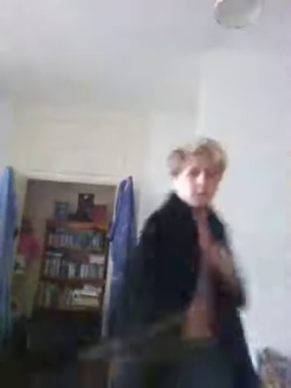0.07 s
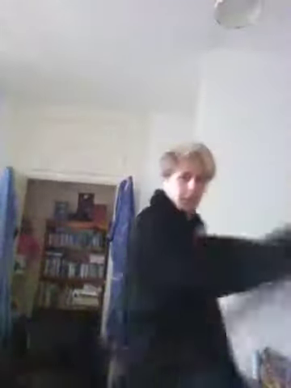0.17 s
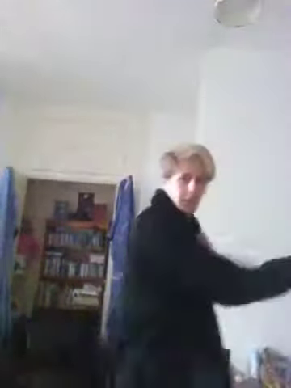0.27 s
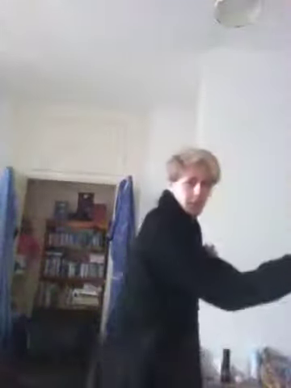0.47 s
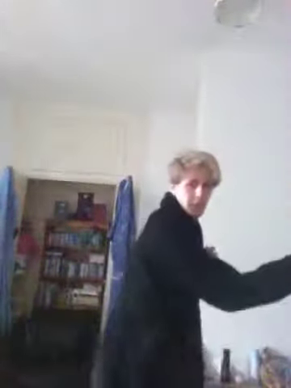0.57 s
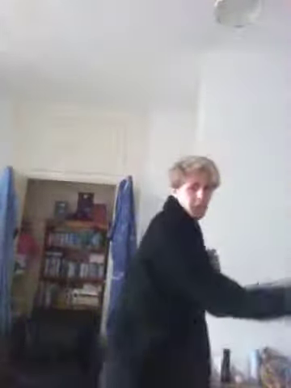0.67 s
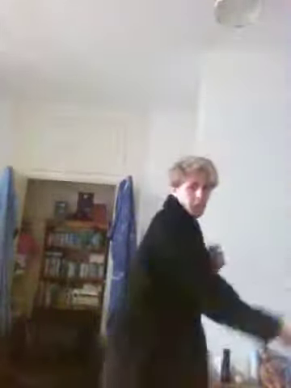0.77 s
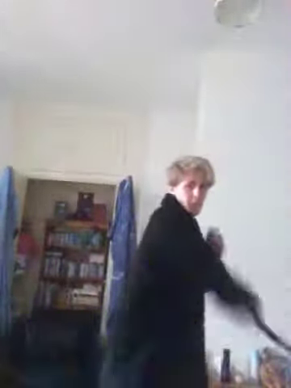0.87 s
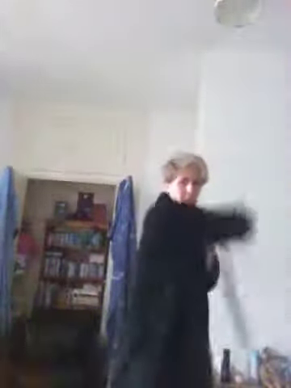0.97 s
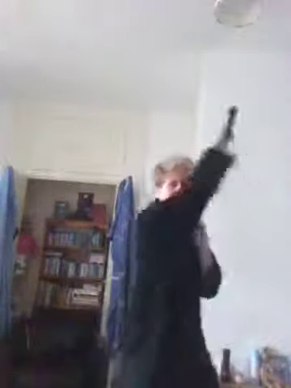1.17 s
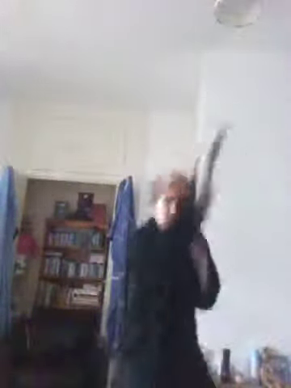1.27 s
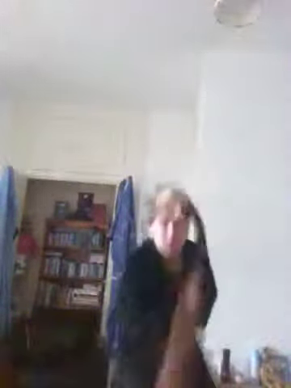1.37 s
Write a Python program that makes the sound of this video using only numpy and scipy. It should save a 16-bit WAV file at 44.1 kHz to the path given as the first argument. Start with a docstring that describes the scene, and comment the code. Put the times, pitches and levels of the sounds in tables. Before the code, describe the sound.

One sharp snap of swung fabric, then a soft whoosh and faint clothing rustle.

```python
"""A strip of cloth is swung like a whip: it swishes through the air, its tip cracks and it shudders taut. The
heavy coat of the person swinging it flaps and rustles. Then the arm sweeps the cloth up again with a hollow
whoosh, a scrape of the sleeve and soft, low thumps. The small, quiet room rings, the draught buffets the
microphone, and a low hum and faint hiss lie underneath."""
import sys
import numpy as np
from scipy import signal
from scipy.fft import rfft, irfft
from scipy.io import wavfile

SR = 44100
rng = np.random.default_rng(int(sys.argv[2]) if len(sys.argv) > 2 else 0)


def wrap_up_sound(samples):
    """Save the sound to the file named by the first command line argument, as 16-bit audio."""
    columns = np.atleast_2d(samples).T
    # keep every value between -1 and 1, then stretch to whole-number steps
    tamed = np.clip(columns, -1, 1)
    steps = np.round(tamed * 32767).astype(np.int16)
    wavfile.write(sys.argv[1], SR, steps)


N = 61739
TIME = np.arange(N) / SR

# shock waves from the tip: centre_s, level_db, length_ms, suction_share (of the push)
TIP_SHOCKS = [(0.2875, -9, 0.19, 0.044), (0.2888, -3.6, .42, 1.0)]
# the frayed tip fizzes at each shock: pitch_hz, level_db, ring_s
TIP_FIZZ = (10400, -16, 0.0016)
# the cloth jerks taut: peak_s, level_db, width_ms
CLOTH_JERK = (.2923, -9, 0.2)
# the tones it shudders with: pitch_hz, level_db, ring_s
SHUDDER_TONES = [(125, -33.5, 0.12), (250, -19.5, 0.055), (410, -11.5, 0.027), (780, -12.5, 0.009),
                 (1400, -24, 0.012)]

def crack(edge_ms=0.04):
    """Each shock from the tip pushes the air, then sucks it back; the cloth jerks taut and shudders."""
    out = np.zeros(N)
    for centre_s, db, length_ms, suction in TIP_SHOCKS:
        ms = (np.arange(N) - round(centre_s * SR)) / SR * 1000
        pulse = np.exp(-np.abs(ms) / (length_ms / 2)) * np.tanh(np.abs(ms) / (edge_ms / 2))
        out += from_db(db) * pulse / pulse.max() * np.where(ms < 0, 1, -suction)
        out += ring(centre_s, *TIP_FIZZ)
    jerk_s, db, width_ms = CLOTH_JERK
    out -= from_db(db) * np.exp(-np.abs(TIME - jerk_s) * 1000 / width_ms)
    # the shudder starts high and sags as the cloth slackens
    return out + sum(ring(jerk_s, *tone, sharp_share=0.3) for tone in SHUDDER_TONES)


# tone colour of the tearing air: pitch_hz, level_db
SWISH_COLOUR = [(200, 8), (900, -5.5), (2500, 2.5), (5000, 0), (8000, -4.5), (11000, -17.5), (16000, -27)]

def swish(peak_s=0.2878, peak_db=-30.5, rise_db_per_s=294, fall_db_per_s=1500):
    """Air tears past the cloth, louder as the tip speeds up towards the crack."""
    drop_db = np.maximum((peak_s - TIME) * rise_db_per_s, (TIME - peak_s) * fall_db_per_s)
    return noise(SWISH_COLOUR) * from_db(peak_db - drop_db)


# folds of the coat flap: start_s, level_db, pitch_hz
FOLD_FLAPS = [(.039, -34.5, 314), (0.0528, -27.5, 293), (0.0619, -32, 400), (.149, -34.5, 307),
              (.157, -33.5, 267), (.192, -30, 121), (0.202, -26.5, 250), (0.228, -39, 154)]
# the coat swings: peak_s, level_db, rise_s, fall_s
COAT_SWINGS = [(0.069, -44, 0.062, 0.12), (.19, -42, 0.11, 0.2), (1.08, -53.5, 0.14, 0.22),
               (1.275, -52, .17, 0.18)]
# their dull tone colour: pitch_hz, level_db
SWING_COLOUR = [(60, -10), (110, -3.5), (190, 0), (330, -6), (470, -4.5), (700, -8), (1300, -13),
                (4000, -89)]

def coat(flap_cycles=0.84):
    """Each fold pushes the air for a wave or two, over the dull swing of the heavy fabric."""
    out = noise(SWING_COLOUR) * sum(swell(*swing) for swing in COAT_SWINGS)
    for start_s, db, hz in FOLD_FLAPS:
        cycles = np.maximum(TIME - start_s, 0) * hz
        age = 2 * cycles / flap_cycles
        out += from_db(db) * age * np.exp(1 - age) * np.sin(2 * np.pi * cycles)
    return out


# sleeve and coat rub: peak_s, level_db, rise_s, fall_s, tilt_db_per_octave, top_hz
SLEEVE_RUBS = [(.035, -53.5, 0.083, 0.056, 1.5, 12000), (.1, -41, 0.059, 0.077, -1, 10500),
               (0.154, -42.5, 0.046, 0.051, -6, 4900), (0.203, -39.5, 0.058, 0.086, -3, 15200),
               (.612, -56.5, 0.027, 0.055, -1.5, 12000), (1.032, -62, 0.59, 1, -1, 14300),
               (1.285, -54, 0.08, 0.13, 1.5, 12000), (1.395, -56, 0.039, 0.084, -4.5, 9000)]
# their tone colour: pitch_hz, level_db
RUB_COLOUR = [(200, -22), (600, -14.5), (1200, -9), (2600, -2.5), (4500, -8), (8000, -10), (11000, -14.5),
              (16000, -28)]
# the sleeve catches and scrapes at full stretch: peak_s, level_db, rise_s, fall_s, hold_s
SLEEVE_SCRAPE = (1.238, -51, .013, .11, .016)
# its tone colour: pitch_hz, level_db
SCRAPE_COLOUR = [(500, -13), (1300, -5), (2000, 0), (2800, -3), (3600, -.5), (5200, -1.5), (6300, -13),
                 (12000, -25)]

def rustle(grain_db=1.2, grain_hz=352):
    """Cloth slides on cloth, the weave catching in fine grains."""
    grain = rms_one(from_db(grain_db * wobble(grain_hz)))
    rubs = sum(swell(*shape) * filtered(noise(RUB_COLOUR, tilt), top_hz, "low")
               for *shape, tilt, top_hz in SLEEVE_RUBS)
    scrape = swell(*SLEEVE_SCRAPE) * noise(SCRAPE_COLOUR)
    return grain * (rubs + scrape)


# the upward whoosh: peak_s, level_db, rise_s, fall_s, hold_s
UPWARD_WHOOSH = (.968, -53, .055, .12, .055)
# its tone colour: pitch_hz, level_db
WHOOSH_COLOUR = [(150, -18), (350, -2), (600, -1), (720, -5), (1000, 0), (1250, -3), (1550, -18),
                 (2400, -19), (4000, -40)]
# tones in the rushing air: pitch_hz, width_hz, peak_s, level_db, rise_s, fall_s, hold_s
HOLLOW_TONES = [(845, 65, .966, -52, .05, .14, .04), (478, 45, .99, -50.5, .065, .06, .028),
                (479, 48, 1.24, -56, .25, .08, .05)]

def upswing():
    """Air rushes round the rising arm and cloth, with hollow tones in it."""
    whoosh = noise(WHOOSH_COLOUR) * swell(*UPWARD_WHOOSH)
    return whoosh + sum(wandering_tone(hz, width) * swell(*shape) for hz, width, *shape in HOLLOW_TONES)


# low thumps: peak_s, level_db, fall_s, hold_s, pitch_hz
LOW_THUMPS = [(.87, -56, .05, .04, 96), (1.07, -59, .07, .01, 105), (1.2, -53.5, .04, .015, 98),
              (1.36, -56, .06, .015, 82)]

def thumps(rise_s=0.03, width_hz=26):
    """Soft, low thumps sound as the weight shifts."""
    return sum(wandering_tone(hz, width_hz) * swell(peak_s, db, rise_s, fall_s, hold_s)
               for peak_s, db, fall_s, hold_s, hz in LOW_THUMPS)


# puffs of air: peak_s, level_db, rise_s, fall_s
AIR_GUSTS = [(.205, -39, 0.035, 0.095), (.285, -43.5, 0.055, 0.11), (.395, -44, 0.14, 0.06),
             (.55, -59.5, 0.051, 0.039), (.635, -61, .035, 0.1)]
# their deep tone colour: pitch_hz, level_db
GUST_COLOUR = [(20, -15), (45, 2.5), (100, 2.5), (160, -10), (300, -30), (1000, -59)]

def draught():
    """Stirred air rumbles on the microphone."""
    return noise(GUST_COLOUR) * sum(swell(*gust) for gust in AIR_GUSTS)


# tone colour of the room's ring: pitch_hz, level_db
ROOM_COLOUR = [(80, -1), (250, 0), (450, -4.5), (650, -4), (900, -.5), (1200, -1), (2500, 2.8), (5000, 1),
               (9000, -4), (12000, -12), (16000, -26)]
# time it takes to fade by 60 dB: pitch_hz, ring_s
ROOM_RING_TIMES = [(100, 0.416), (300, 0.35), (600, .38), (1200, 0.49), (2500, 0.49), (6000, 0.5),
                   (14000, 0.6)]

def room_tail(level_db=-10, gap_s=0.0017, build_s=0.019):
    """Countless echoes blur into a ring, each band of pitches dying at its own speed."""
    edges_hz = np.geomspace(50, 17000, 15)
    white, tail = rng.standard_normal((2, N)), np.zeros(N)
    for k, (low, high) in enumerate(zip(edges_hz, edges_hz[1:])):
        hz = np.sqrt(low * high)
        fade = from_db(at_hz(ROOM_COLOUR, hz) - 60 * TIME / at_hz(ROOM_RING_TIMES, hz))
        tail += filtered(white[k % 2], [low, high], "band") * fade
    tail *= np.clip((TIME - gap_s) / build_s, 0, 1)
    return from_db(level_db) * tail / np.linalg.norm(tail)


# early echoes scattered by walls and shelves: delay_s, level_db, spread_s
WALL_ECHOES = [(.0015, -20, 0.0011), (0.01, -16, 0.006), (0.033, -14, 0.0075)]
# floor and ceiling throw the bass back whole: delay_s, level_db
BASS_BOUNCES = [(.012, -13), (.026, -17)]

def room(sound, echo_top_hz=4500, bounce_top_hz=380):
    """The room answers a sound with quick echoes and a fading ring."""
    tail, echoes = room_tail(), np.zeros(N)
    for delay_s, db, spread_s in WALL_ECHOES:
        cluster = rng.standard_normal(N) * np.exp(-((TIME - delay_s) / spread_s) ** 2)
        echoes += from_db(db) * cluster / np.linalg.norm(cluster)
    response = tail + filtered(echoes, echo_top_hz, "low")
    bounces = sum(from_db(db) * np.interp(TIME - delay_s, TIME, sound, left=0)
                  for delay_s, db in BASS_BOUNCES)
    return signal.fftconvolve(sound, response)[:N] + filtered(bounces, bounce_top_hz, "low")


# the room's hum: pitch_hz, level_db, waver_share
HUM_TONES = [(91.5, -65, 1), (179.7, -58.5, 0.3)]
# it swells and fades: time_s, change_db
HUM_SWELL = [(0, -6), (.5, -6), (.56, 0), (.7, 0), (.8, -5), (.96, -5), (1.07, 0), (1.22, -1), (1.38, 2)]
# tone colour of the hiss: pitch_hz, level_db
HISS_COLOUR = [(25, -1), (70, -14.5), (300, -1.5), (600, -9), (1500, -10.5), (3000, -18.5), (8000, -24),
               (16000, -26.5)]

def hum_and_hiss(hiss_db=-60.5, waver_hz=10.1):
    """A low hum wavers over a faint, steady hiss."""
    out = from_db(hiss_db) * noise(HISS_COLOUR)
    change_db = np.interp(TIME, *np.transpose(HUM_SWELL))
    for hz, db, waver_share in HUM_TONES:
        level_drift, phase_drift = waver_share * wobble(waver_hz, (2, N))
        phase = 2 * np.pi * hz * TIME
        tone = (1 + level_drift) * np.sin(phase) + phase_drift * np.cos(phase)
        out += from_db(db + change_db) * tone
    return out


def from_db(db):
    """Turn decibels into a volume multiplier."""
    return 10 ** (np.asarray(db) / 20)


def rms_one(x):
    """Scale a signal so its typical size (rms) is 1."""
    return x / np.sqrt(np.mean(x ** 2) + 1e-20)


def at_hz(table, hz):
    """Read between a table's rows, with pitch spaced in octaves."""
    pitches, values = np.transpose(table)
    return np.interp(np.log(hz + 1), np.log(pitches), values)


def filtered(x, hz, kind):
    """Gently keep the lows, the highs or a band."""
    sections = signal.butter(2, np.minimum(hz, SR / 2 - 10), kind, fs=SR, output="sos")
    return signal.sosfilt(sections, x + 1e-18)


def noise(colour, tilt_db=0):
    """Noise of size 1; the colour and a tilt per octave set how its pitches balance."""
    hz = np.arange(N // 2 + 1) * SR / N
    gain = from_db(at_hz(colour, hz) + tilt_db * np.log2(hz + 20))
    return rms_one(irfft(rfft(rng.standard_normal(N)) * gain, N))


def wobble(top_hz, shape=N):
    """A random drift of size 1, mostly slower than top_hz."""
    return rms_one(filtered(rng.standard_normal(shape), top_hz, "low"))


def swell(peak_s, db, rise_s, fall_s, hold_s=0):
    """A volume curve that climbs 20 dB in rise_s, holds, then sinks 20 dB in fall_s."""
    away = np.maximum((peak_s - TIME) / rise_s, (TIME - peak_s - hold_s) / fall_s)
    return from_db(db - 20 * np.maximum(0, away))


def wandering_tone(hz, width_hz, flutter_share=0.35):
    """A tone of size 1 whose pitch and level wander at random."""
    pitch, level = wobble(width_hz, (2, N))
    phase = 2 * np.pi * np.cumsum(hz + width_hz / 2 * pitch) / SR
    return rms_one((1 + flutter_share * level) * np.sin(phase))


def ring(start_s, hz, db, ring_s, sharp_share=0, slacken_s=0.0015):
    """A tone that fades 60 dB in ring_s; it starts high by sharp_share and soon settles."""
    age = np.maximum(TIME - start_s, 0)
    lead_s = sharp_share * slacken_s * (1 - np.exp(-age / slacken_s))
    return from_db(db - 60 * age / ring_s) * np.sin(2 * np.pi * hz * (age + lead_s))


def scene(clothes_to_room_db=-1):
    """Whip and clothing in the room, with draught and hum."""
    whip = crack() + swish()
    clothes = rustle() + coat() + upswing()
    echoes = room(whip + from_db(clothes_to_room_db) * clothes)
    return (whip + clothes + echoes + thumps() + draught() + hum_and_hiss())[None]


def record(dry, bass_cut_hz=22, treble_stop_hz=16900):
    """The microphone loses the deepest bass; the highest treble is cut."""
    treble_cut = signal.cheby2(12, 70, treble_stop_hz, fs=SR, output="sos")
    return signal.sosfilt(treble_cut, filtered(dry, bass_cut_hz, "high"))


dry = scene()
out = record(dry)
wrap_up_sound(out)
```